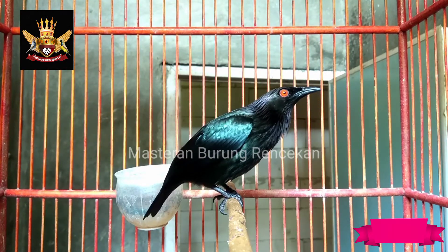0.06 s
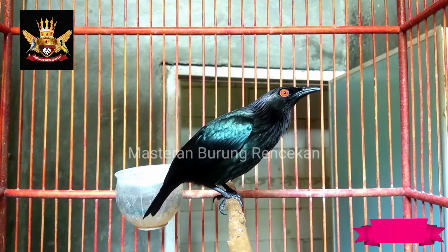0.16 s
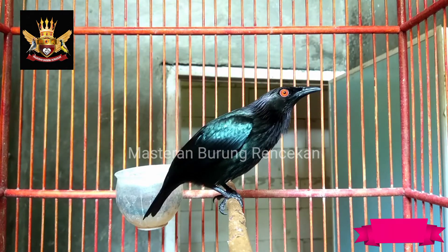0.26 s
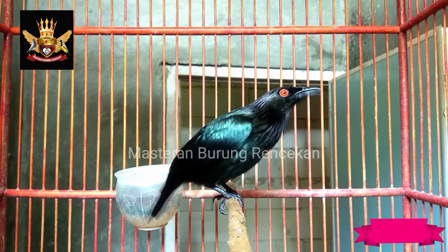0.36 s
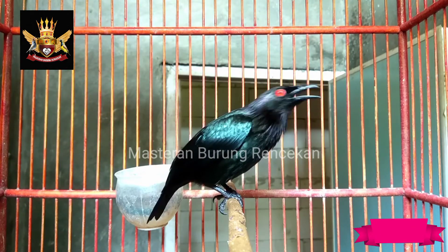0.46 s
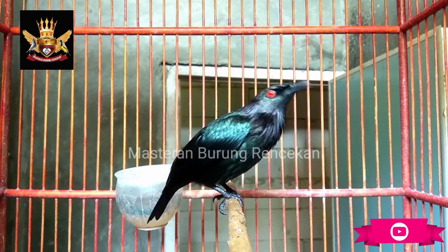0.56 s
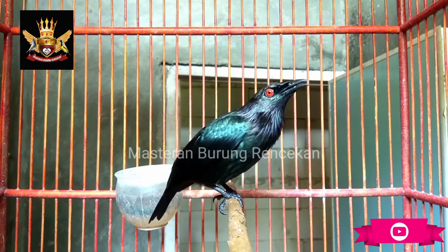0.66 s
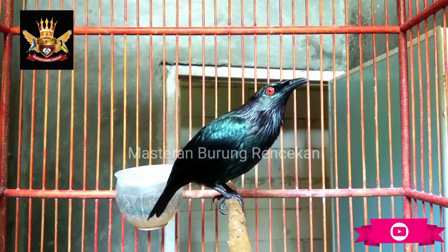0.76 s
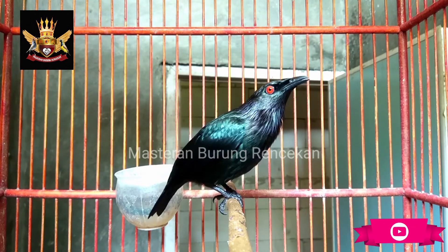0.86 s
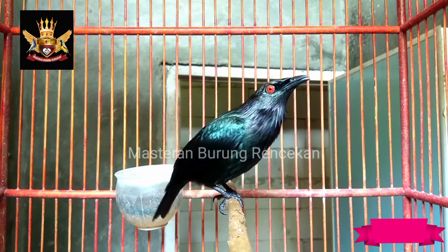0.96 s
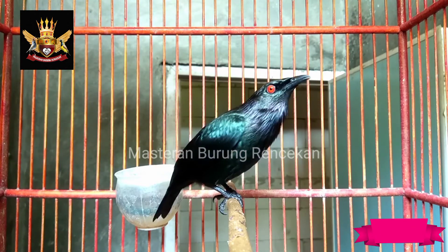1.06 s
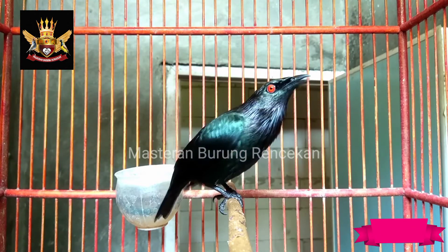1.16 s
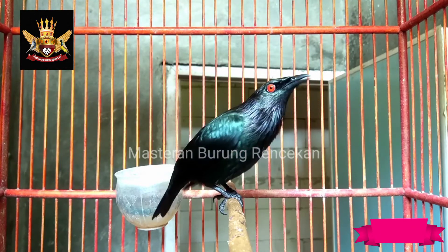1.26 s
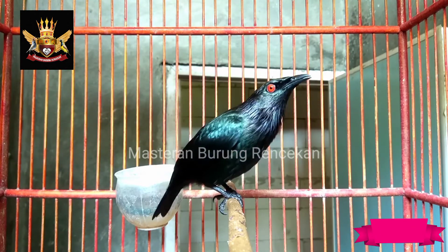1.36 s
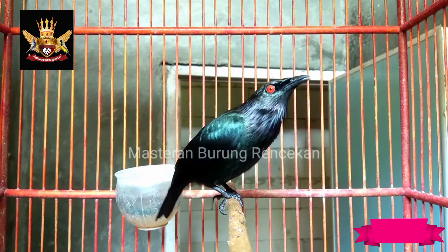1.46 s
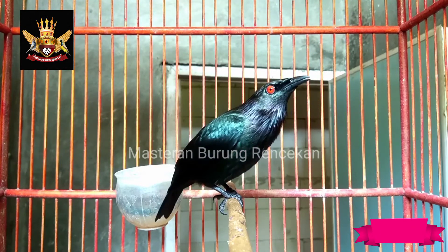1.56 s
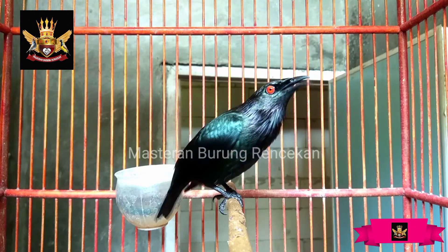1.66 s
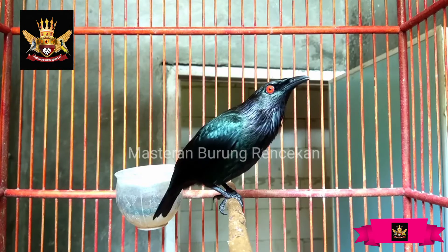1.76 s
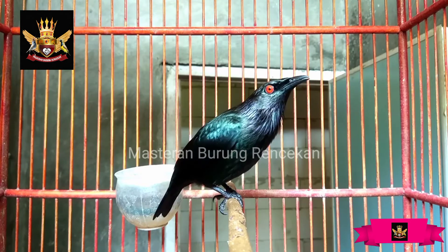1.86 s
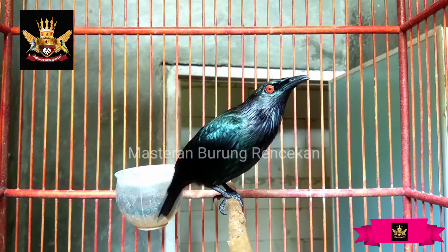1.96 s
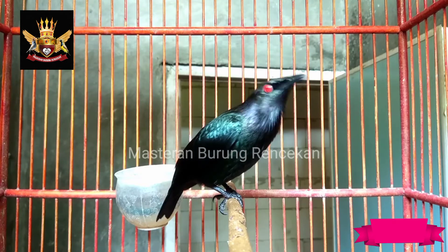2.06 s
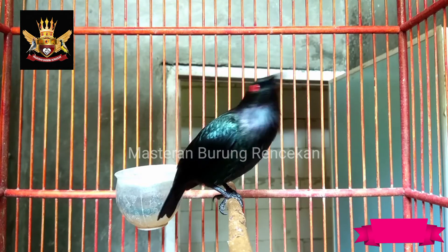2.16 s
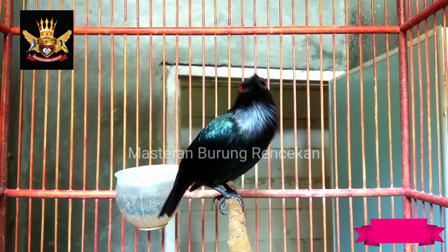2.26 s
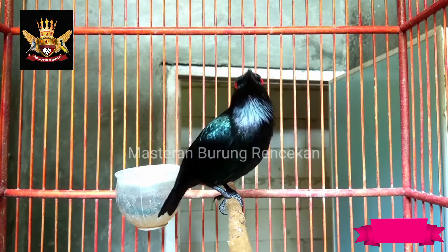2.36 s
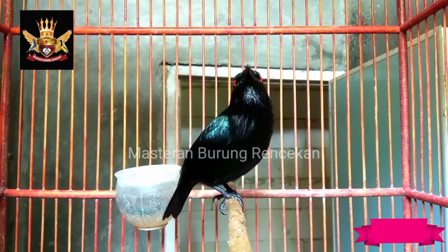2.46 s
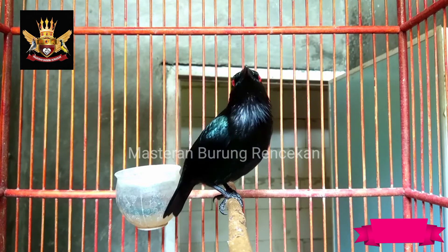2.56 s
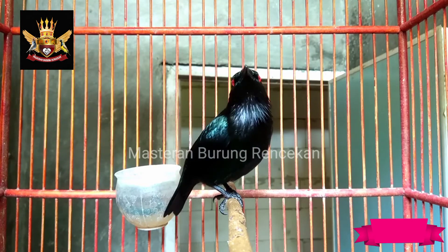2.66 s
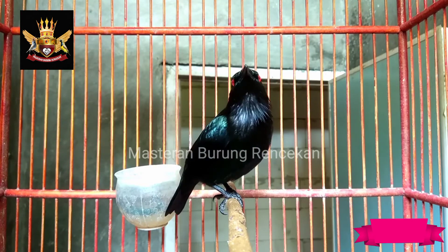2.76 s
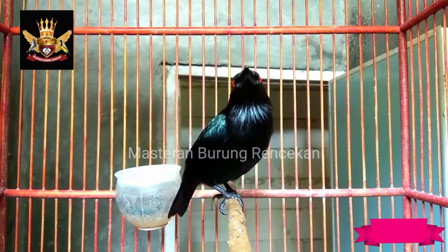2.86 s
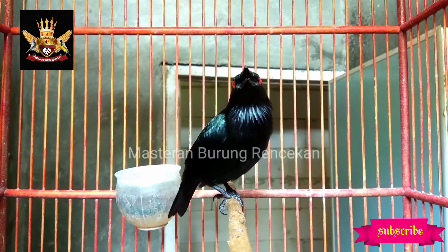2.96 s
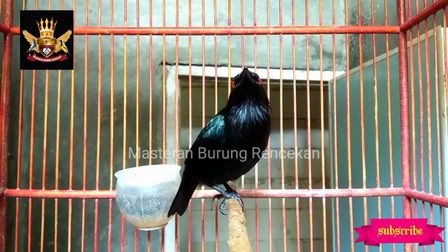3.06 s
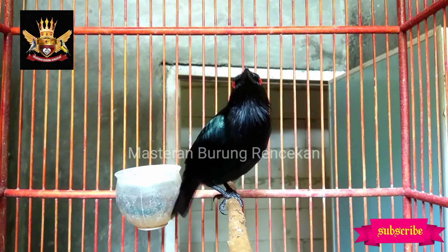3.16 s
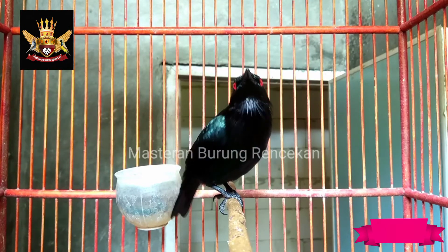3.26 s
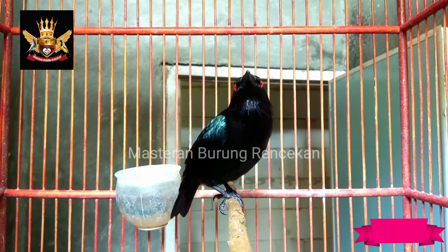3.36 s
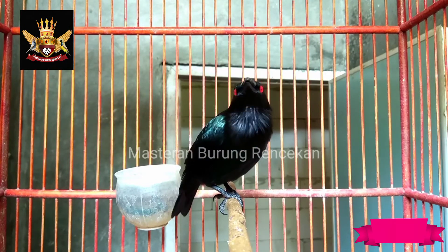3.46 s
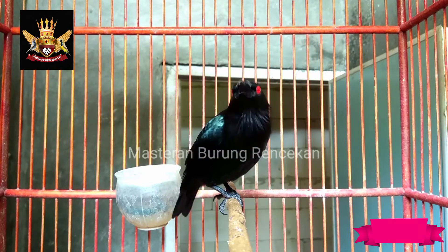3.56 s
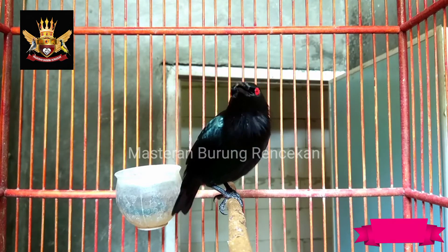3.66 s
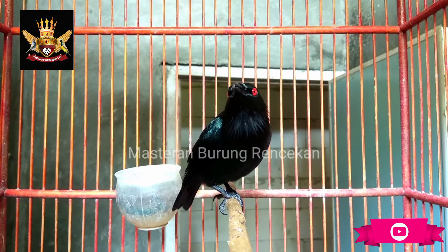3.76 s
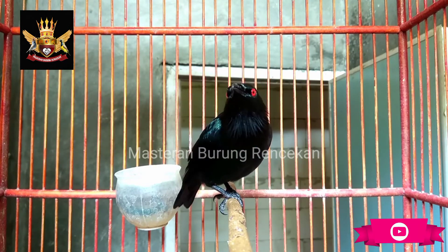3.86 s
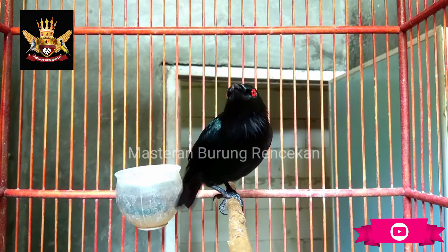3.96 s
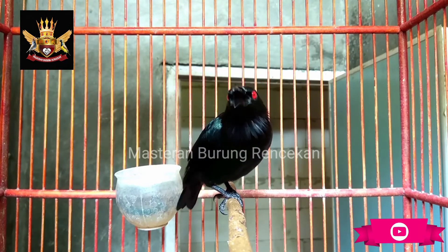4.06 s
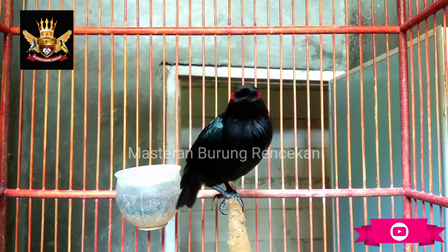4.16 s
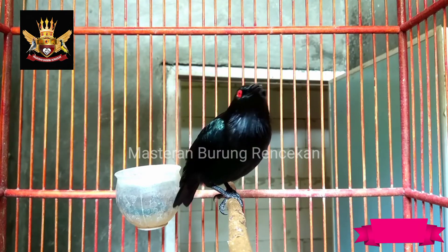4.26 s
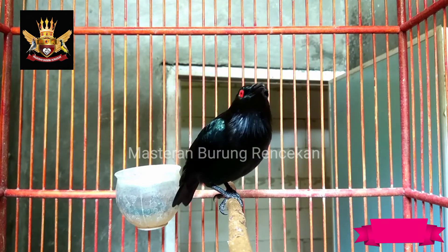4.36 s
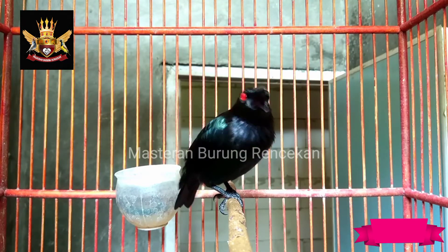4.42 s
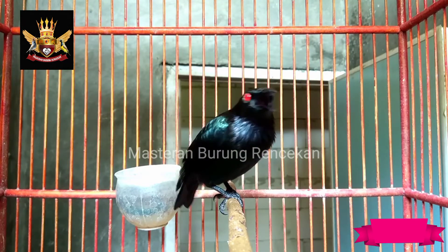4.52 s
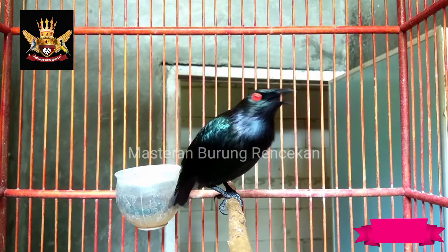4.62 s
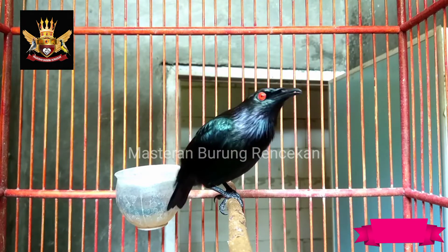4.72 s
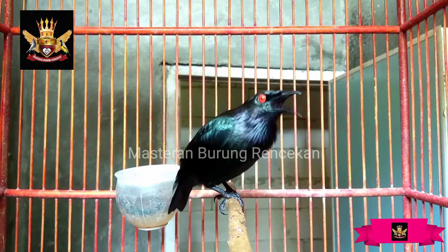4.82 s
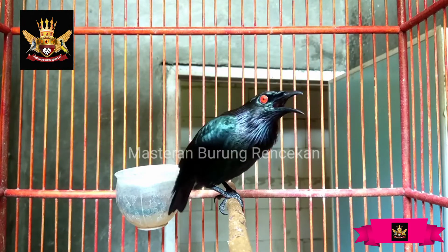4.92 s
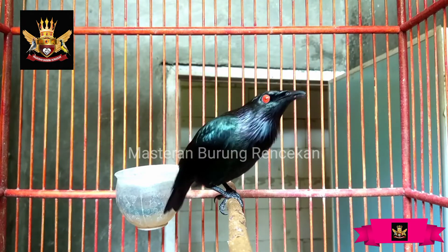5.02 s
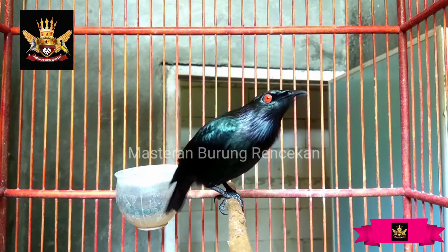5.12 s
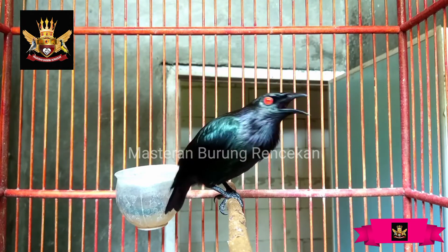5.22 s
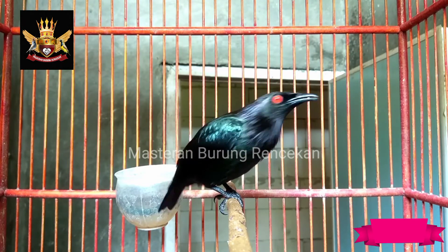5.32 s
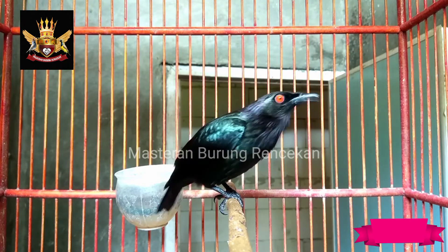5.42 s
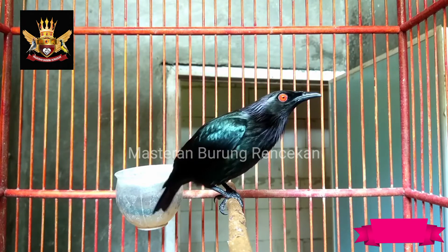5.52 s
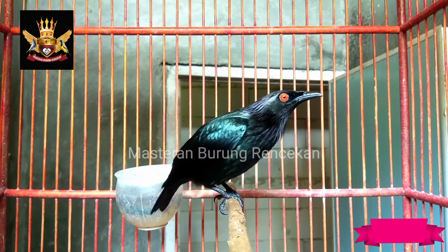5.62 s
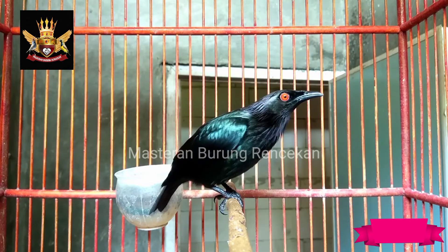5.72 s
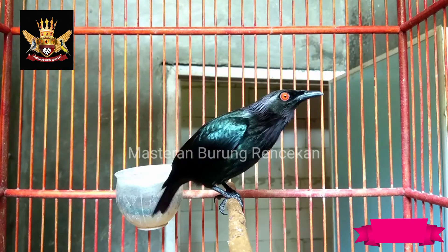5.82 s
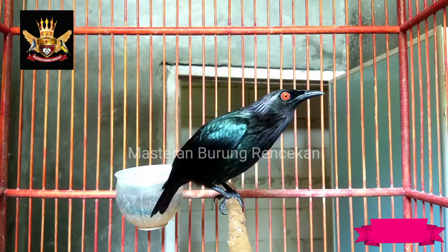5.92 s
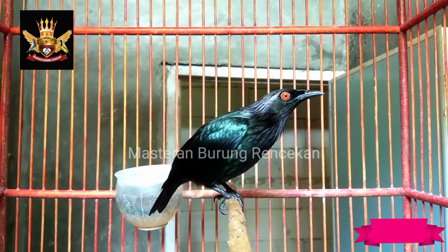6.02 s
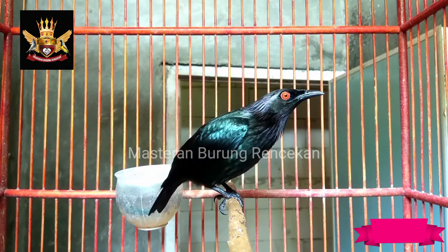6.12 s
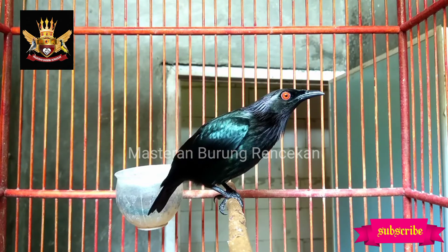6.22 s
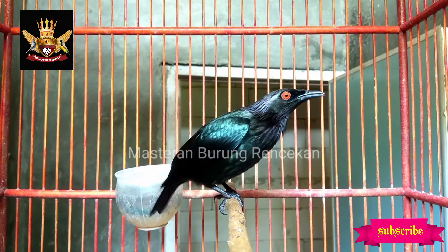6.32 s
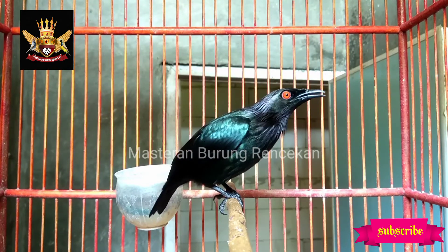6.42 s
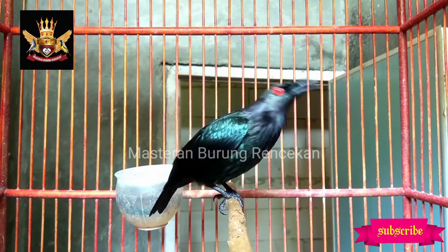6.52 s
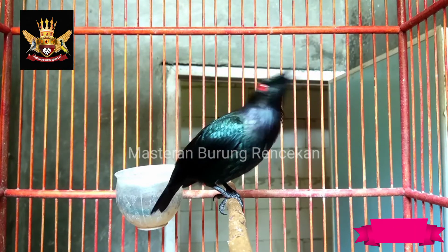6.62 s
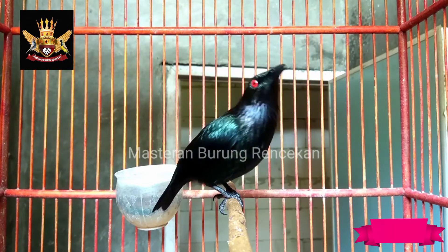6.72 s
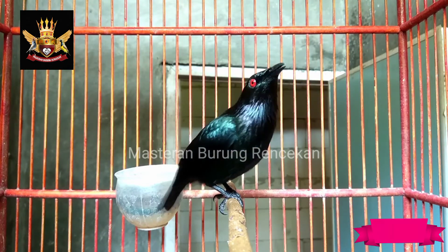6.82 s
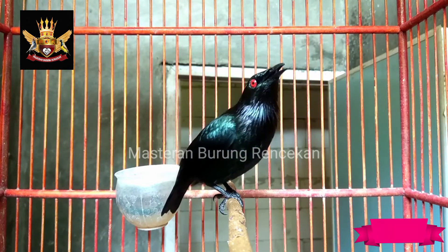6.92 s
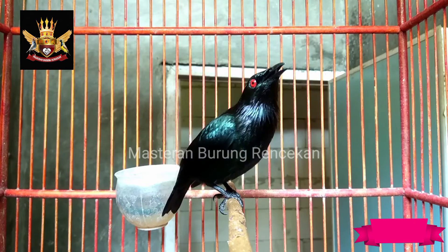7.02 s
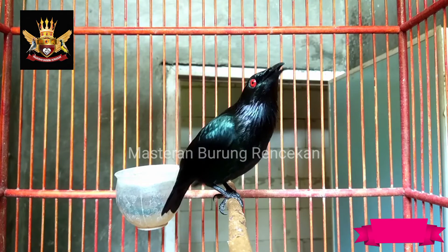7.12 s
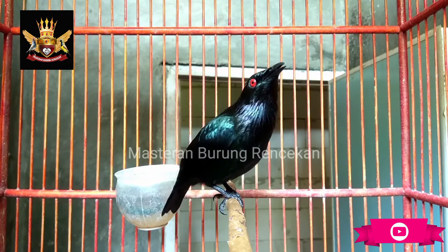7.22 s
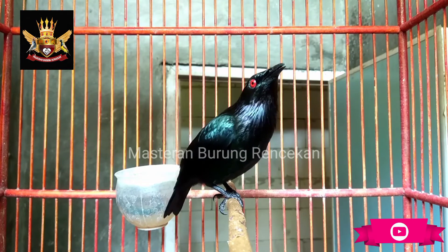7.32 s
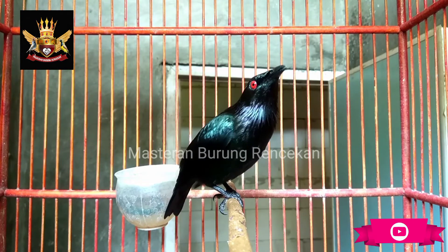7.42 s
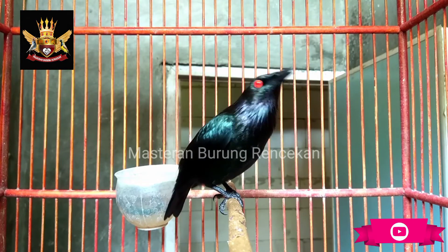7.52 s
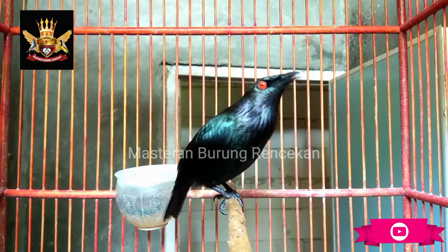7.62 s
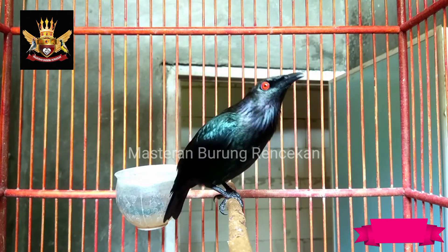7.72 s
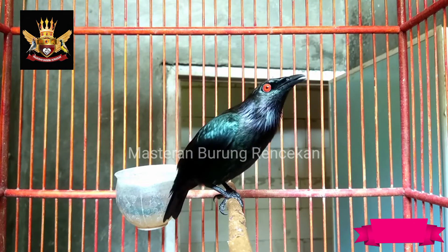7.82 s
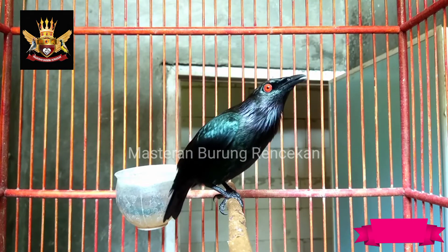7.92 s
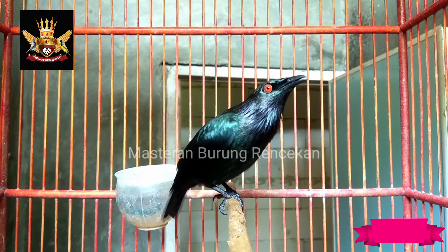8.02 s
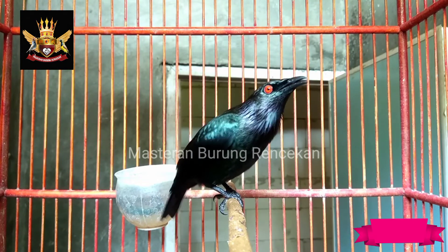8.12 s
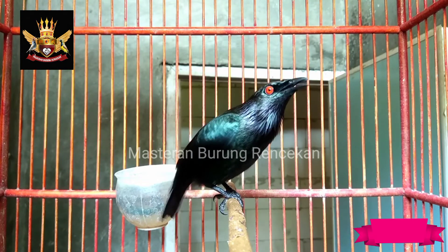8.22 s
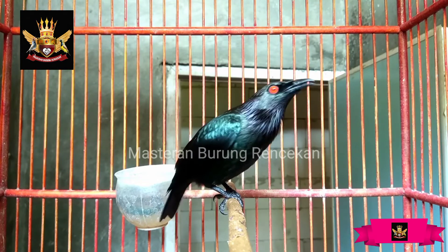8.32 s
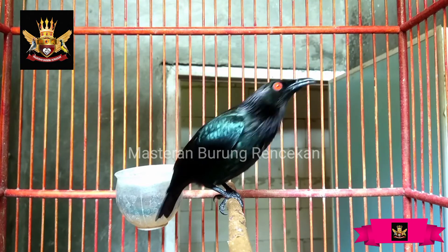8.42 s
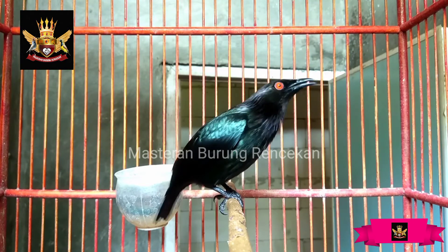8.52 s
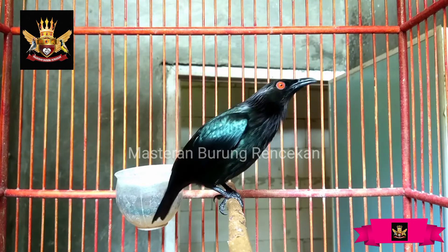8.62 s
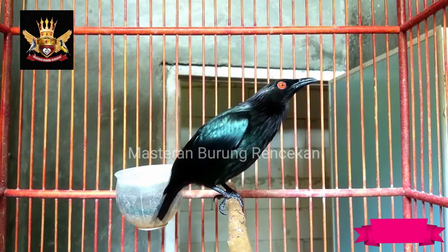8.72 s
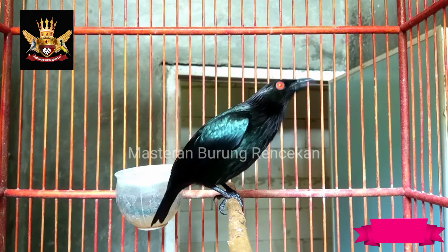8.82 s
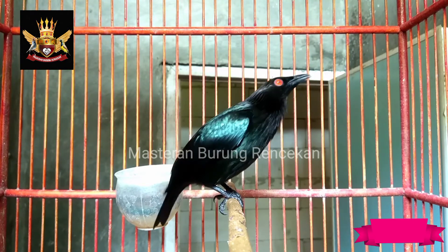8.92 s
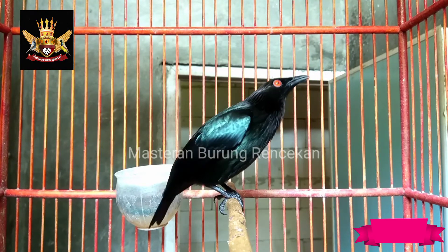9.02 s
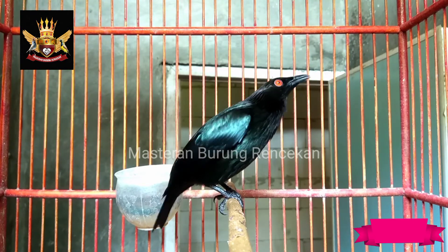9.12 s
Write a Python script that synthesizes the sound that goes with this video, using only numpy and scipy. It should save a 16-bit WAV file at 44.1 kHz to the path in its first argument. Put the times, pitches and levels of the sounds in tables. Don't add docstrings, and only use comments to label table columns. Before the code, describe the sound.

A caged starling sings close by in a small hard room: swooping whistles, clicks, buzzy chips, rattling trills, thin high whistles, then repeated buzzy rises.

```python
import sys
import numpy as np
from scipy import signal
from scipy.fft import rfft, irfft, next_fast_len
from scipy.io import wavfile
from scipy.ndimage import uniform_filter1d, minimum_filter1d, map_coordinates

SR = 44100
rng = np.random.default_rng(int(sys.argv[2]) if len(sys.argv) > 2 else 0)


def int16_out(signal):
    q = np.round(np.clip(np.atleast_2d(signal).T, -1, 1) * 32767)
    wavfile.write(sys.argv[1], SR, q.astype(np.int16))


def boost_factor(decibels):
    exponent = np.asarray(decibels, float) / 20
    return 10 ** exponent


N = 404838

# (2nd partial, 3rd partial) [dB re the 1st]
PURE, CLEAR, REEDY, NASAL, CREAKY = (-30, -45), (-47, -19), (-4.5, -12), (6.1, 6), (-11, -14)
HOLLOW, LOW_SIDE, HIGH_SIDE = (6, -3), (-2.5, -1), (-4.5, -40)


def coloured(points, channels):
    size = next_fast_len(N)
    hz, db = np.transpose(points)
    bin_hz = np.arange(size // 2 + 1) * SR / size
    gain = boost_factor(np.interp(np.log(bin_hz + 1), np.log(hz), db))
    x = irfft(rfft(rng.standard_normal((channels, size))) * gain, size)[:, :N]
    return x / x.std()


def walk(rate, size):
    k = max(int(SR / rate), 2)
    held = np.repeat(rng.standard_normal(size // k + 2), k)
    return 1.5 * uniform_filter1d(uniform_filter1d(held, k), k)[:size]


def patches(shape, bins, frames):
    x = uniform_filter1d(rng.standard_normal(shape), bins, axis=0)
    x = uniform_filter1d(x, frames, axis=1)
    return x / x.std()


# (time [s], level [dB])
HUM_LEVEL = [(0, -44), (1.5, -50), (2.8, -46.5), (3.15, -107), (3.5, -40), (5.3, -74.5), (5.7, -51),
             (8.2, -46), (8.6, -81), (9.18, -46)]
# (frequency [Hz], level [dB per Hz])
AIR_COLOUR = [(30, -1), (150, 6.5), (700, 7), (1200, -1), (3000, 3.5), (14000, 3)]


def background():
    hum_hz, hum_width_hz = 368, 82
    air_level_db, patchy_db, bass_fade_db_per_s = -51.5, 5, 2.42
    hz, t, z = signal.stft(rng.standard_normal((3, N)), SR, nperseg=1024)
    rows_hz = hz[:, None]
    centre_hz = hum_hz * (1 + .12 * patches((1, len(t)), bins=1, frames=40))
    hum_level = boost_factor(np.interp(t, *np.transpose(HUM_LEVEL)) + 11.0)
    hum = hum_level * np.exp(-((rows_hz - centre_hz) / hum_width_hz) ** 2)
    colour_hz, colour_db = np.transpose(AIR_COLOUR)
    air_db = air_level_db + np.interp(np.log(hz + 1), np.log(colour_hz), colour_db)
    bass_fade = bass_fade_db_per_s * t * (rows_hz < 900)
    swells = patchy_db * np.clip(rows_hz / 600, .4, 1) * patches(hum.shape, bins=20, frames=16)
    air = boost_factor(air_db[:, None] - bass_fade + swells)
    ports = (z[0] + 1.41 * z[1:]) * (hum + air)
    return signal.istft(ports, nperseg=1024)[1][:, :N]


def puffs(table, width):
    out = np.zeros(N + SR)
    t = np.arange(SR // 2) / SR
    for s, db, hz, length in table:
        edges = [max(hz * (1 - 0.53 * width), 150), min(hz * (1 + 1.07 * width), 16000)]
        band = signal.butter(2, edges, "band", fs=SR, output="sos")
        x = signal.sosfilt(band, rng.standard_normal(len(t)))
        shape = np.clip(t / (length / 5), 0, 1) ** 2 * np.exp(-(t / length) ** 3)
        out[int(abs(s) * SR):][:len(t)] += boost_factor(db) * shape * x / x.std()
    return out[:N]


# (time [s], level [dB], centre [Hz], length [s])
CAGE_KNOCKS = [(0, -51, 173, 0.35), (0.304, -43.5, 990, 0.096), (0.489, -40, 680, 0.086),
               (1.3, -42, 864, .2), (2.559, -34.5, 900, .018), (2.892, -38.5, 895, 0.018),
               (3.309, -37, 600, 0.1), (7.075, -42.5, 970, 0.085)]


def cage_knocks():
    return puffs(CAGE_KNOCKS, width=0.34)


# (time [s], level [dB], centre [Hz], length [s])
SOFT_RUSTLES = [(0.453, -22.5, 5600, 0.13), (2.772, -41, 5100, 0.15), (3.164, -32, 4030, 0.3),
                (3.657, -24, 3390, 0.1), (3.896, -35.5, 3600, .11), (6.264, -40.5, 3220, 0.061),
                (7.418, -34, 2200, 0.23), (8.095, -41, 2750, 0.99), (9.041, -34.5, 3230, 0.087)]


def rustles():
    return puffs(SOFT_RUSTLES, width=0.97)


# (time [s], level [dB], centre [Hz], length [s])
BEAK_CLICKS = [
    (1.055, -22.5, 3420, 0.006),
    (1.492, -19.5, 3450, 0.019),
    (3.53, -2.5, 6400, 0.004),
    (6.958, -27, 7340, 0.0028),
]


def beak_clicks():
    return puffs(BEAK_CLICKS, width=1.236)


# (time [s], level [dB], centre [Hz], length [s])
WIDE_BURSTS = [(0.211, -34.5, 11700, 0.32), (2.076, -28, 4560, 0.15), (2.274, -13, 6560, 0.05),
               (2.882, -30.5, 6300, 0.018), (3.289, -14, 6600, 0.026), (4.075, -20.5, 8900, 0.13),
               (4.48, -20.5, 8400, .063), (4.852, -18, 9300, 0.067), (5.217, -20.5, 9900, 0.057),
               (5.507, -21.5, 5600, 0.031), (6.833, -43, 7500, 0.11)]


def wide_bursts():
    return puffs(WIDE_BURSTS, width=1.23)


# (centre [Hz], level [dB])
RASP_BANDS = [(3150, -26.5), (4250, -25.5), (5500, -20.5), (6800, -18), (10900, -15.5), (13200, -15)]


def rasp():
    start_s, length_s = 4.097, .165
    return puffs([(start_s, db, hz, length_s) for hz, db in RASP_BANDS], width=.08)


# (time [s], pitch [Hz], level [dB])
SWOOP_LOW_STROKE = [(0.515, 3260, -27), (0.56, 3510, -21.5), (0.6, 3560, -21.5), (0.64, 4283, -13.5),
                    (0.7, 4640, -11), (0.75, 4540, -14.5), (0.78, 4280, -24), (0.795, 3680, -16.5)]
SWOOP_HIGH_STROKE = [(0.53, 4690, -24), (0.565, 5080, -11), (0.585, 5540, -6.5), (0.61, 6090, -27),
                     (0.63, 5960, -41)]
SWOOP_LAST_STROKE = [(0.74, 6870, -6.5), (0.76, 6750, -12), (0.78, 5970, -9), (0.79, 4680, -19.5)]


def opening_swoop():
    return [(SWOOP_LOW_STROKE, REEDY), (SWOOP_HIGH_STROKE, CLEAR), (SWOOP_LAST_STROKE, HIGH_SIDE)]


# (start [s], whip end [s], whip length [s], held level [dB], top [Hz])
HOOK_WHISTLES = [
    (1.052, 1.288, 0.02, -34.5, 5530),
    (1.497, 1.749, 0.041, -20.5, 5220),
]


def hook(s, whip, whip_s, held_db, top_hz):
    creak_s, creak_db, creak_to_hz = .042, -28, 2750
    peak_db, peak_hz, held_hz, sag_hz, whip_db = -7, 3110, 3335, 128.3, -10
    on = s + creak_s
    creak = [(s, 410, creak_db - 4.5),
             (s + .35 * creak_s, 2230, creak_db),
             (on, creak_to_hz, creak_db + 3.5)]
    tone = [(on, creak_to_hz + 90, peak_db - 7),
            (on + 0.0132, peak_hz, peak_db),
            (on + 0.0264, held_hz, peak_db - 9),
            (on + 0.0717, held_hz - 0.538 * sag_hz, held_db - 2.5),
            (whip - 2 * whip_s, held_hz - sag_hz, held_db),
            (whip - whip_s, held_hz + 150, whip_db - 9),
            (whip - .45 * whip_s, 4150, whip_db),
            (whip, top_hz - 150, whip_db + 1.5),
            (whip + 0.014, top_hz, whip_db - 11.5)]
    return [(creak, CREAKY), (tone, (-30, -30))]


# (time [s], pitch [Hz], level [dB])
DIVE_STROKE = [(2.147, 6400, -14), (2.151, 4760, -5.5), (2.158, 4760, -9.5), (2.163, 2800, -18)]
SHRILL_WHISTLE = [(2.908, 6630, -15), (2.918, 8220, -8), (2.932, 8310, -8), (2.96, 8910, -18),
                  (3.0, 8460, -14), (3.08, 7790, -19.5), (3.13, 7960, -16.5)]


def dive_and_shrill():
    return [(DIVE_STROKE, REEDY), (SHRILL_WHISTLE, PURE)]


# (start [s], length [s], from [Hz], to [Hz], level [dB])
CHIPS_CLEAR = [(2.201, 0.064, 2610, 2717, -27.5), (2.248, 0.021, 2670, 2130, -29),
               (2.322, 0.045, 2890, 2700, -26), (3.296, 0.018, 3350, 2854, -11.5),
               (3.361, 0.026, 3110, 2885, -13.5), (3.591, 0.014, 2100, 3570, -21),
               (3.602, 0.026, 3595, 3770, -21.5), (3.611, 0.008, 3790, 2860, -15),
               (3.67, 0.034, 3490, 2770, -22), (5.877, 0.02, 8000, 6900, -36),
               (5.508, 0.018, 3400, 3490, -23), (3.416, .018, 5230, 3800, -25.5),
               (4.117, 0.0263, 2888, 3190, -16.5), (4.17, 0.021, 3240, 3050, -37),
               (4.218, 0.032, 3160, 3026, -32.5)]
CHIPS_REEDY = [(2.196, 0.011, 1935, 1600, -27.5), (2.243, 0.014, 1780, 1620, -31),
               (3.283, 0.008, 2570, 1960, -18.5), (3.288, 0.017, 3005, 4760, -16.5),
               (3.409, 0.0071, 2530, 2360, -19), (3.421, 0.0057, 2080, 1840, -18),
               (3.437, 0.015, 2290, 1970, -20.5), (3.456, 0.012, 1790, 1860, -18),
               (3.468, 0.0295, 2230, 2300, -21), (3.494, 0.006, 2320, 1780, -18),
               (3.738, 0.0073, 5120, 4170, -19), (4.485, 0.053, 4350, 4560, -26.5),
               (5.514, .02, 2378, 2604, -17.5)]
CHIPS_NASAL = [(2.114, .013, 1996, 1444, -21.5), (2.274, 0.0092, 1073, 1160, -16.5),
               (2.285, 0.05, 1683, 1793, -14.5), ]
CHIPS_HOLLOW = [(2.341, 0.05, 2140, 2088, -14.5), (3.532, 0.059, 2020, 2000, -18),
                (3.662, 0.041, 2178, 2103, -16.5), (3.69, 0.0327, 2135, 2223, -22.5)]


def chip(s, length, from_hz, to_hz, db):
    attack = 0.11
    return [(s, from_hz, db - 5),
            (s + attack * length, from_hz + attack * (to_hz - from_hz), db),
            (s + length, to_hz, db - 4.5)]


# (start [s], level [dB])
RASP_ARCHES = [
    (4.142, -9),
    (4.18, -3.5),
    (4.218, -11),
]


def arch(s, db):
    length_s, foot_hz, top_hz, foot_drop_db = .032, 4450, 7580, 10
    rows = []
    for u in np.linspace(0, 1, num=9):
        hz = top_hz - (top_hz - foot_hz) * (2 * u ** 0.717 - 1) ** 4
        rows.append((s + u * length_s, hz, db - foot_drop_db * (2 * u - 1) ** 2))
    return rows


# (first high note [s], end [s], high plus low note [s], low side climb [Hz per pair], high side [dB])
TWO_SIDED_TRILLS = [
    (4.538, 4.695, 0.047, 202.5, -1),
    (4.906, 5.061, 0.049, 22.5, -0.5),
    (5.276, 5.382, .0515, -36.5, -2),
]


def trill(s, end, pair, climb_hz, db):
    lead_s, lead_swell_db, lead_db = .042, 19, -10.5
    high_hz, high_level_db, high_share, high_fall_hz = 5580, -1, .46, 190
    low_hz, low_level_db = 4055, -10.5
    tires_db = 2.5
    lead_hz = 3917 - .6 * climb_hz
    lead = [(s - lead_s, lead_hz + 60, lead_db - lead_swell_db),
            (s - lead_s / 2, lead_hz, lead_db + 1.5),
            (s - .001, lead_hz, lead_db)]
    notes = [(lead, LOW_SIDE)]
    miss_hz = 52.6 * rng.standard_normal((4, 3))
    for k, on in enumerate(np.arange(s, end - pair / 8, pair)):
        off = on + high_share * pair
        high_db = db + high_level_db - k * tires_db
        low_db = low_level_db - k * tires_db
        top_hz = high_hz + 0.56 * climb_hz + miss_hz[k, 0]
        from_hz, to_hz = low_hz + k * climb_hz + miss_hz[k, 1:]
        high = [(on, top_hz, high_db), (min(off, end), top_hz - high_fall_hz, high_db)]
        notes.append((high, HIGH_SIDE))
        if off + pair / 4 < end:
            low = [(off + 0.0045, from_hz, low_db), (min(on + pair, end), to_hz, low_db)]
            notes.append((low, LOW_SIDE))
    return notes


# (start [s], length [s], level [dB])
LOW_UNDER_CHIPS = [
    (6.414, 0.033, -17.5),
    (6.957, 0.017, -10),
]


def under_chip(s, length, db):
    held_hz = 3370
    return [(s, 2850, db - 12.5), (s + 0.0105, held_hz - 50, db), (s + length, held_hz, db - 12.5)]


# (start [s], length [s], tone [Hz], swell time [s], swell level [dB])
THIN_WHISTLES = [
    (6.427, 0.374, 6670, 6.72, -22.5),
    (6.974, 0.3, 6510, 7.13, -18.5),
]


def thin(s, length, tone_hz, swell, swell_db):
    from_hz, settle_s, start_db, dip_db, held_db = 5600, 0.037, -13, -24, -23.5
    end = s + length
    levels = [(s, start_db), (s + 0.035, start_db - 9.5), (s + 0.0725, dip_db),
              ((s + 0.057 + swell) / 2, held_db), (swell, swell_db),
              (max(end - .05, swell + .005), swell_db - 4), (end, swell_db - 35)]
    return [(t, tone_hz - (tone_hz - from_hz) * np.exp(-(t - s) / settle_s), db) for t, db in levels]


# (start [s], end [s], start pitch [Hz], held level [dB], peak level [dB])
BUZZY_RISES = [(7.369, 7.539, 4780, -19.5, -10.5), (7.579, 7.739, 4620, -24, -6.5),
               (7.784, 7.954, 4360, -23, -9), (7.998, 8.096, 4920, -22, -7),
               (8.142, 8.231, 4900, -15.5, -7), (8.267, 8.355, 5050, -17.5, -8.5),
               (8.414, 8.515, 4720, -19.5, -17), (8.563, 8.671, 4660, -28.5, -16)]


def rise(s, end, from_hz, held_db, peak_db):
    shelf_hz, knee_hz, top_hz = 5050, 5714, 6414
    attack_s, snap_s, release_s = 0.025, .038, .012
    shelf, knee = s + attack_s, end - snap_s
    return [(s, from_hz, held_db - 4),
            (shelf, shelf_hz, held_db),
            (shelf + 0.5 * (knee - shelf), shelf_hz + 0.57 * (knee_hz - shelf_hz),
             held_db + 0.18 * (peak_db - held_db)),
            (knee, knee_hz, peak_db),
            (end - release_s, top_hz, peak_db - 4.0),
            (end, top_hz + 200, peak_db - 22)]


# (throw time [s], peak level [dB], top [Hz])
CLOSING_FLICKS = [
    (8.863, -9, 8730),
    (9.043, -9.5, 6670),
]


def flick(s, db, top_hz):
    held_hz, swell_s, swell_db, fade_db = 4560, .043, 24.5, 7.5
    throw_s = (top_hz - held_hz) / 250000
    return [(s - swell_s, held_hz, db - swell_db),
            (s, held_hz, db),
            (s + throw_s / 2, (held_hz + top_hz) / 2 - 250, db - fade_db / 3),
            (s + throw_s, top_hz, db - fade_db)]


def song_notes():
    notes = opening_swoop() + dive_and_shrill()
    for shape, table, voice in [(chip, CHIPS_CLEAR, CLEAR), (chip, CHIPS_REEDY, REEDY),
                                (chip, CHIPS_NASAL, NASAL), (chip, CHIPS_HOLLOW, HOLLOW),
                                (under_chip, LOW_UNDER_CHIPS, (2, -3)), (thin, THIN_WHISTLES, (-14, -40)),
                                (rise, BUZZY_RISES, (-23, -40)), (flick, CLOSING_FLICKS, (-9, -6)),
                                (arch, RASP_ARCHES, (-3, -30))]:
        notes += [(shape(*row), voice) for row in table]
    for phrase, table in [(hook, HOOK_WHISTLES), (trill, TWO_SIDED_TRILLS)]:
        for row in table:
            notes += phrase(*row)
    return notes


# (from [s], to [s], flutter depth [0-1], share of a note that stays clean [0-1])
BUZZY_STRETCHES = [(2.33, 2.4, .4, 0), (2.9, 3, .7, .16), (3.4, 3.52, .3, 0), (3.6, 3.75, .4, 0),
                   (4.13, 4.25, .3, 0), (4.52, 4.68, .25, 0), (4.9, 5.4, .12, 0), (7.3, 7.99, .85, .62),
                   (7.99, 8.6, .85, .05)]


def note(rows, second_db, third_db):
    flutter_hz, flutter_swing = 180, .07
    s, hz, db = np.transpose(sorted(rows))
    i = np.arange(int(s[0] * SR), int(s[-1] * SR) + 2)
    t = i / SR
    along = np.linspace(0, 1, len(i))
    shake = 0
    for start, end, depth, clean in BUZZY_STRETCHES:
        if start <= s[0] < end:
            shake = shake + depth * np.clip((along - clean) / (1 - clean), 0, 1) ** .5
    beat = 2 * np.pi * flutter_hz * t + 1.2 * walk(60, len(i))
    pitch = np.interp(t, s, hz)
    for _ in range(2):
        pitch = uniform_filter1d(pitch, size=110, mode="nearest")
    pitch = pitch * (1 + flutter_swing * shake * np.sin(beat) + .005 * walk(400, len(i)))
    phase = 2 * np.pi * np.cumsum(pitch) / SR
    partial_db = [0, second_db] + [third_db - .002 * hz.mean() * k for k in range(8)]
    tone = np.zeros(len(i))
    for k, d in enumerate(partial_db, 1):
        tone += boost_factor(d) * np.sin(k * phase) * (k * pitch < .4 * SR)
    tone *= np.sqrt(2 / sum(boost_factor(d) ** 2 for d in partial_db[:4]))
    edge = np.clip(np.minimum(t - t[0], t[-1] - t) / .002, 0, 1)
    level = boost_factor(np.interp(t, s, db) + 2.0 * walk(144.5, len(i)))
    level = level * (1 + 0.49 * shake * np.cos(beat)) * edge
    return i, tone * level, level


def starling():
    song, effort = np.zeros(N), np.zeros(N)
    hiss = coloured([(300, -14.0), (1500, -11.0), (5000, -4.5), (14000, -10.0)], channels=1)[0]
    for rows, voice in song_notes():
        i, tone, level = note(rows, *voice)
        song[i] += tone
        effort[i] += level
    return song + boost_factor(-27) * effort * hiss


def echoes(t60, start):
    t = np.arange(SR) / SR
    shared, left, right = rng.standard_normal((3, SR))
    x = np.array([shared + 3.02 * left, np.roll(shared, -3) + 2.85 * right]) * (t > start)
    dull = signal.lfilter([.45], [1, -.55], x)
    bright = x - dull
    decay = np.log(1000) * t / t60
    x = dull * np.exp(-decay) + bright * np.exp(-decay / 0.24)
    return x / np.sqrt(np.mean(np.sum(x ** 2, axis=1)))


# (time [s], left minus right [dB], left lag [samples])
HEAD_TURNS = [
    (0, 3, 2.35),
    (6.498, 2, 2.6),
    (7.198, 6.5, 13.1),
    (9.18, 5.5, 6.92),
]


def scene():
    bird = starling() + cage_knocks() + rustles() + beak_clicks() + wide_bursts() + rasp()
    s, pan_db, lag = np.transpose(HEAD_TURNS)
    n = np.arange(N)
    pan_db, lag = np.interp(n / SR, s, pan_db), np.interp(n / SR, s, lag)
    late_left = map_coordinates(bird, [n - lag], order=3)
    direct = np.array([late_left * boost_factor(pan_db / 2), bird * boost_factor(-pan_db / 2)])
    walls = boost_factor(-7.5) * echoes(t60=0.42, start=0.015)
    cage = boost_factor(-11) * echoes(t60=.08, start=0.00079)
    left, right = direct + signal.fftconvolve(bird[None], walls + cage, axes=1)[:, :N]
    right = boost_factor(1.5) * signal.sosfilt(signal.butter(2, 9500, fs=SR, output="sos"), right)
    return boost_factor(-0.5) * np.array([left, right]) + background()


def overload(x):
    ceiling = .97
    top = signal.butter(4, 6500, "high", fs=SR, output="sos")
    thump = signal.butter(3, [90, 2500], "band", fs=SR, output="sos")
    square = x ** 2
    x = x + boost_factor(-7.5) * signal.sosfilt(top, square) + boost_factor(-41.5) * signal.sosfilt(thump, square)
    gain = ceiling / np.maximum(np.abs(x), ceiling)
    return x * uniform_filter1d(minimum_filter1d(gain, size=129), size=65)


def masking(x, near_db, far_db, own_db):
    top_hz = 15500
    hz, _, z = signal.stft(x, SR, nperseg=1024)
    rows_hz = hz[:, None]
    power = uniform_filter1d(np.mean(np.abs(z) ** 2, axis=0), size=3, axis=1)
    band = uniform_filter1d(power, size=7, axis=0)
    near = boost_factor(2 * near_db) * uniform_filter1d(power, size=101, axis=0, origin=16)
    far = boost_factor(2 * far_db) * power.sum(axis=0) * (rows_hz / top_hz) ** 6
    own = boost_factor(2 * own_db) * (rows_hz > 200) * uniform_filter1d(power, size=31, axis=0)
    margin_db = 10 * np.log10(band / (near + far + own)) + 4 * patches(power.shape, bins=6, frames=8)
    keep = np.clip(margin_db / 2, .01, 1) * (rows_hz < top_hz)
    return signal.istft(z * keep, nperseg=1024)[1][:, :N]


def band_limit(x):
    return signal.sosfilt(signal.butter(12, 15950, fs=SR, output="sos"), x)


def record(dry):
    rumble_cut = signal.butter(2, 45, "high", fs=SR, output="sos")
    heard = signal.sosfilt(rumble_cut, overload(dry))
    mix = masking(heard, near_db=-25, far_db=-44, own_db=-8)
    return band_limit(mix)


dry = scene()
out = record(dry)
int16_out(out)
```